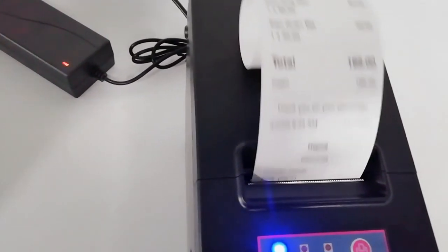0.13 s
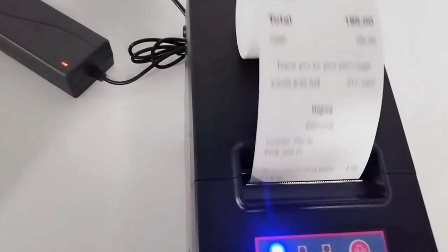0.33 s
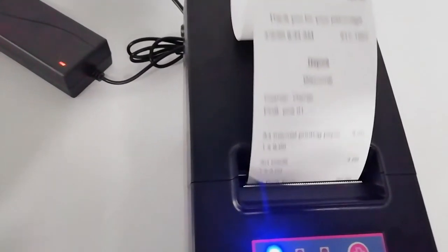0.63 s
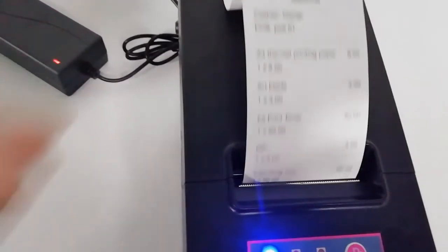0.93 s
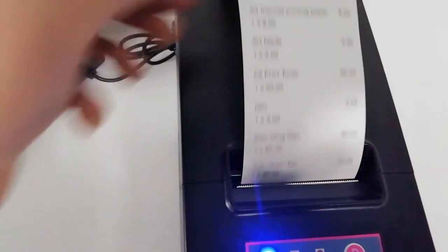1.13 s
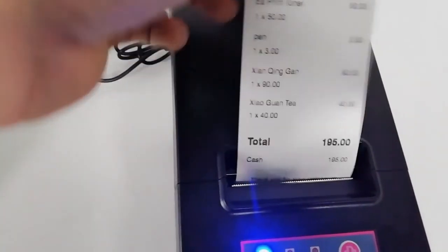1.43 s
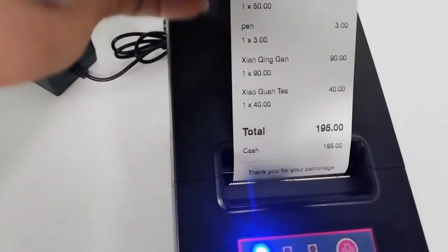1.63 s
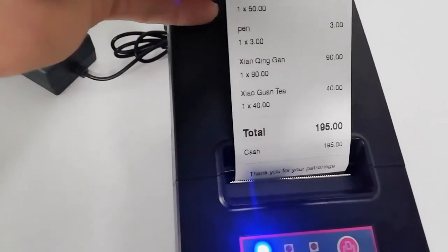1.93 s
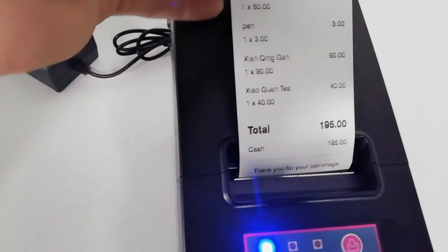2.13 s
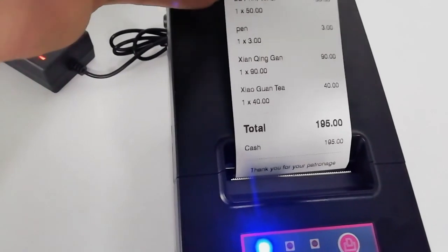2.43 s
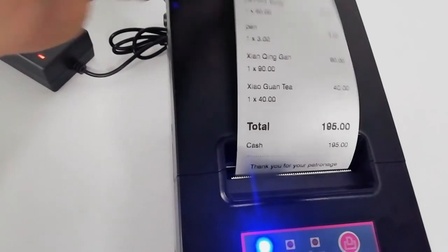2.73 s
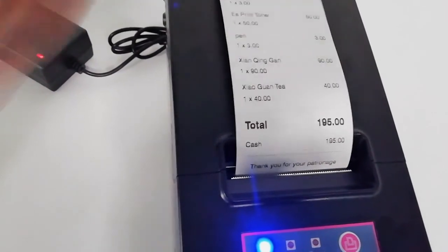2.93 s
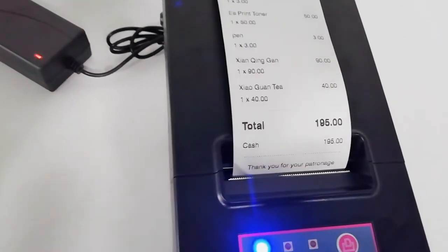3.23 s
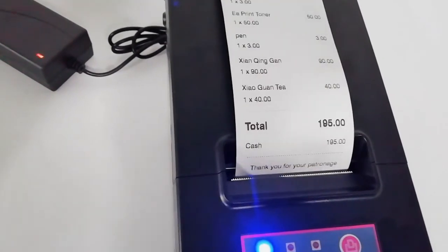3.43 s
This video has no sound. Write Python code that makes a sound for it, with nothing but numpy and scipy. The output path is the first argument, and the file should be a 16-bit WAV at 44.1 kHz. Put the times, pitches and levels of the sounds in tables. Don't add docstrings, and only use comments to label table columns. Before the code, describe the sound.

A small receipt printer whines steadily, paper hissing and gears clicking, then stops with a brief second buzz; a hand rustles and snaps the strip. Close microphone, quiet room with low rumble.

```python
import sys
import numpy as np
from scipy import signal
from scipy.fft import rfft, irfft
from scipy.io import wavfile
from scipy.ndimage import uniform_filter1d

SR = 44100
rng = np.random.default_rng(int(sys.argv[2]) if len(sys.argv) > 2 else 0)


def unload_audio(sound):
    columns = np.transpose(np.atleast_2d(sound))
    steps = np.round(np.clip(columns, -1, 1) * 32767)
    wavfile.write(sys.argv[1], SR, steps.astype(np.int16))


def undo_db(level):
    steps = np.asarray(level, float) / 20
    return 10 ** steps


N = 158760

STEP_HZ, STEPS_PER_TURN = 414.0, 13
START_SPEED = .9
# start t/s, stop t/s, level/dB
MOTOR_RUNS = [
    (-1.0, 1.416, 0.0),
    (1.484, 1.546, -2.5),
]
# t/s, whine lift per step multiple/dB, rattle lift/dB
MOTOR_LOAD = [(0, -0.07, 3.5), (.3, .5, 1), (0.551, 0.21, 1), (.8, 0.19, 0.5), (1.101, -0.2, 1),
              (1.3, -0.35, 1.9), (1.6, -0.1, -1)]


def evened(x):
    return x / np.sqrt(np.mean(x ** 2) + 1e-20)


def coloured(x, points):
    f, db = np.transpose(points)
    hz = np.fft.rfftfreq(len(x), 1 / SR)
    gain = undo_db(np.interp(np.log(hz + 1), np.log(f + 1), db, -90, -90))
    return evened(irfft(rfft(x) * gain, len(x)))


def slow(hz):
    f = np.fft.rfftfreq(N, 1 / SR)
    spectrum = rfft(rng.standard_normal(N)) * (f > 0) / (1 + (f / hz) ** 4)
    return evened(irfft(spectrum, N))


def ring(x, hz, width):
    return signal.lfilter(*signal.iirpeak(hz, hz / width, SR), x)


def ring_twice(x, hz, width):
    return evened(ring(ring(x, hz, width), hz, width))


def add(mix, s, sound):
    part = mix[round(s * SR):][:len(sound)]
    part += sound[:len(part)]


def swell(t, start, peak, end):
    return np.sin(np.pi / 2 * np.interp(t, [start, peak, end], [0, 1, 0])) ** 1.3


def grit():
    grains_per_s = 9000
    size_db = 1.5 * np.minimum(rng.exponential(1, N), 5)
    slips = undo_db(size_db) * (rng.random(N) < grains_per_s / SR)
    return rng.standard_normal(N) * (0.52 + slips)


def patchy(x, depth_db):
    z = signal.stft(x, nperseg=256)[2]
    field = rng.standard_normal(z.shape[::-1]).T
    field = uniform_filter1d(field, size=5, axis=0)
    field = uniform_filter1d(field, size=20, axis=1)
    return signal.istft(z * undo_db(depth_db * evened(field)), nperseg=256)[1][:N]


def rotor(t):
    spin_up_s, coast_s = .012, .0035
    on, speed = np.zeros(N), np.ones(N)
    for start, stop, db in MOTOR_RUNS:
        attack = np.clip((t - start) / 0.001, 0, 1)
        on += undo_db(db) * attack * np.exp(-np.maximum(t - stop, 0) / coast_s)
        lag = np.exp(-np.maximum(t - start, 0) / spin_up_s)
        speed -= (1 - START_SPEED) * (t > start) * lag
    shaft = 2 * np.pi * np.cumsum(speed) * STEP_HZ / STEPS_PER_TURN / SR
    return on, speed, shaft


def gear_whine(t, speed, shaft):
    teeth, eccentric = 12, .11
    waver_db, waver_hz, phase_wander = .2, 5.0, .02
    strain_from_hz = 3100
    step_levels = [-52.5, -63.5, -60.5, -60, -51.5, -58.5, -58.5, -68, -66, -72, -79, -78]
    mesh_levels = [-76, -65.5, -61.5, -58, -76, -65.5]
    idler_orders = [34, 38, 59, 66, 68, 72, 81, 89]
    idler_levels = [-72, -65, -69, -65, -64, -74, -70, -68]
    # t/s, lift/dB
    gear_strain = [(0, -1), (.25, -1), (.5, -1), (.7, -2), (.95, 2), (1.2, 1), (1.35, 3), (1.6, 0)]

    load_s, load_lift, _ = np.transpose(MOTOR_LOAD)
    start_dull_db = -5 * (1 - speed) / (1 - START_SPEED)
    lift_db = np.interp(t, load_s, load_lift) + start_dull_db
    strain_db = np.interp(t, *np.transpose(gear_strain))
    step_orders = STEPS_PER_TURN * (1 + np.arange(len(step_levels)))
    mesh_orders = teeth * (1 + np.arange(len(mesh_levels)))
    whine = np.zeros(N)
    for orders, levels in ((step_orders, step_levels), (mesh_orders, mesh_levels),
                           (idler_orders, idler_levels)):
        for order, db in zip(orders, levels):
            a, b, c = 2 * np.pi * rng.random(3)
            wobble = 1 + eccentric * (np.cos(shaft + a) + .5 * np.cos(3 * shaft + b))
            k = min(order / STEPS_PER_TURN, 6.5)
            if levels is step_levels and order * STEP_HZ / STEPS_PER_TURN < strain_from_hz:
                load_db = k * lift_db
            else:
                load_db = strain_db + k * start_dull_db
            phase = order * shaft + np.pi + c / 3 + k * phase_wander * slow(waver_hz)
            level = undo_db(db + load_db + k * waver_db * slow(waver_hz))
            whine += np.sqrt(2) * level * wobble * np.cos(phase)
    return whine


def case_rattle(t, shaft):
    # f/Hz, width/Hz, level/dB
    case_modes = [(480, 30, -11), (827, 59, 0), (1204, 78, 1), (1580, 140, 0), (2070, 214, 0),
                  (2480, 120, 2), (2830, 154, 1.5), (3410, 137, 1), (3715, 85, -4.5), (4200, 140, -10)]
    # f/Hz, density/dB per Hz
    rattle_colour = [(120, -3), (250, -0.5), (600, -5), (1000, -12.5), (2100, -4.5), (3200, -19.5),
                     (4500, -46), (6000, -9.5)]
    knock = grit() * (1 + .6 * np.cos(STEPS_PER_TURN * shaft))
    case = evened(sum(undo_db(db) * ring(knock, hz, width) for hz, width, db in case_modes))
    rattle = undo_db(-54.5) * coloured(knock, rattle_colour) + undo_db(-51) * case
    load_s, _, rattle_lift = np.transpose(MOTOR_LOAD)
    return rattle * undo_db(np.interp(t, load_s, rattle_lift) + 1.0 * slow(3.8))


def strip_feed(t):
    # f/Hz, density/dB per Hz
    feed_colour = [(3000, -29), (4600, -12), (6000, -5.5), (7000, -3.5), (8500, -4.5), (9300, -12),
                   (11000, -21), (15900, -32)]
    coast_s = 0.011
    hiss = patchy(coloured(grit(), feed_colour), 1.4)
    level = undo_db(-54.5 + 1.0 * slow(25.0))
    return level * hiss * np.exp(-np.maximum(t - MOTOR_RUNS[0][1], 0) / coast_s)


def table_hum():
    band = signal.butter(2, [18, 91], "band", fs=SR, output="sos")
    return undo_db(-49) * evened(signal.sosfilt(band, rng.standard_normal(N)))


def motor():
    t = np.arange(N) / SR
    on, speed, shaft = rotor(t)
    noise = on * case_rattle(t, shaft) + strip_feed(t)
    noise = noise - .6 * ring(noise, 4420, 520)
    hum = table_hum() * uniform_filter1d(on, 4000)
    return on * gear_whine(t, speed, shaft) + noise + hum


def room_tone():
    # f/Hz, density/dB per Hz
    tone_colour = [(15, -4.5), (30, 8), (120, 0), (300, -10.5), (800, -22.5), (2000, -29.5), (4500, -37.5),
                   (15900, -42)]
    return undo_db(-50.5) * coloured(rng.standard_normal(N), tone_colour)


def narrow_swells():
    # start t/s, peak t/s, end t/s, level/dB, f/Hz; the curled sheet singing while pressed, or,
    # during the motor's long feed, rattles in the mechanism
    curls = [(1.43, 1.44, 1.47, -55, 5320), (2.08, 2.11, 2.15, -73, 2560), (2.27, 2.36, 2.39, -68, 4000),
             (2.477, 2.63, 2.71, -61.5, 4240), (2.62, 2.71, 2.735, -57, 5570),
             (1.235, 1.245, 1.26, -53, 1500), (1.23, 1.22, 1.7, -55.5, 1640), (1.24, 1.34, 1.39, -57, 3500),
             (0.028, 0.13, 0.3, -51, 2200), (0.85, 0.94, 1.2, -65, 3700), (0.67, 0.86, 1.3, -59.5, 667),
             (-.05, .05, .22, -57, 540), (1.55, 1.65, 1.78, -62, 400), (1.43, 1.444, 1.456, -54.5, 1230),
             (1.42, 1.45, 1.56, -59, 754), (2.795, 2.806, 2.825, -55.5, 3030),
             (1.28, 1.34, 1.48, -56.5, 1190)]
    # start t/s, peak t/s, end t/s, level/dB, f/Hz; mostly the taut edge whistling briefly, but
    # the two around 1.5 s are the nudging whine turning brighter
    whistles = [(-.1, .05, .22, -62, 6650), (.2, .3, .4, -68, 4100), (.76, .95, 1.12, -61, 4200),
                (1.0, 1.07, 1.15, -70, 6300), (1.168, 1.177, 1.187, -56, 6700),
                (1.19, 1.196, 1.207, -53, 5000), (1.3, 1.33, 1.41, -56, 3650),
                (1.428, 1.44, 1.47, -57, 5000), (1.498, 1.51, 1.532, -51, 2850),
                (1.505, 1.522, 1.533, -53, 2100), (2.087, 2.098, 2.12, -65, 4800),
                (2.53, 2.6, 2.68, -74, 14500)]
    out, t = np.zeros(N), np.arange(N) / SR
    rasp = grit()
    for events, q in ((curls, 4.5), (whistles, 12)):
        for start, peak, end, db, hz in events:
            out += undo_db(db) * swell(t, start, peak, end) * ring_twice(rasp, hz, hz / q)
    return out


def nicks():
    click_levels = [-43, -38, -36.5, -34, -39, -38.5, -44, -46, -38, -39, -37, -42, -35.5, -41, -37]
    # f/Hz, density/dB per Hz
    click_colour = [(800, -30), (1500, -6), (2400, 0), (3500, -1), (4200, -7), (4800, -30)]
    first_s, steps_per_gear_turn, t60_s = .0727, 37, .016
    out, t = np.zeros(N), np.arange(1500) / SR
    noise = rng.standard_normal((len(click_levels), len(t)))
    for turn, (db, z) in enumerate(zip(click_levels, noise)):
        click = coloured(z, click_colour) * undo_db(-60 * t / t60_s)
        s = first_s + turn * steps_per_gear_turn / STEP_HZ
        add(out, s, undo_db(db) * click / abs(click).max())
    return out


def snaps():
    # t/s, peak level/dB, f/Hz
    creases = [(.716, -41, 3000), (.893, -40, 2800), (1.1947, -37, 7000), (1.255, -42, 6500),
               (1.292, -34, 7000), (1.439, -40, 2600), (1.534, -46, 11950), (2.0717, -50, 7000),
               (2.0717, -50, 1000), (2.2, -49, 2600), (2.2, -49, 7000), (2.447, -52, 8000),
               (2.674, -43, 7000), (2.686, -45, 2100), (2.694, -46, 6500), (2.712, -46, 5570),
               (2.751, -50, 4500), (2.762, -55, 10000), (2.789, -45, 6500), (2.7993, -28.5, 5130),
               (2.7993, -38, 14000), (2.803, -39, 6000), (2.808, -41, 5000), (2.84, -51, 2000),
               (2.87, -56, 2500), (2.73, -50, 5500), (2.93, -54, 2000), (3.399, -56, 10000)]
    t60_s, wide_db = .015, -24.0
    out, t = np.zeros(N), np.arange(900) / SR
    noise = rng.standard_normal((len(creases), len(t)))
    for (s, db, hz), z in zip(creases, noise):
        burst = z * undo_db(-60 * t / t60_s)
        wide = evened(np.diff(burst, prepend=0))
        tick = ring_twice(burst, hz, 1.1 * hz) + undo_db(wide_db) * wide
        add(out, s, undo_db(db) * tick / abs(tick).max())
    return out


def strokes():
    # start t/s, rise t/s, fall t/s, level/dB, share of bending/0-1
    stroke_events = [(1.426, .006, 0.066, -49, 0.8), (1.47, 0.048, 0.046, -55.5, 0.24),
                     (1.17, .06, .2, -60, .1), (1.55, 0.0065, 0.04, -53, 0.9),
                     (1.575, 0.017, 0.13, -49, 0.47), (1.618, 0.061, 0.073, -54.5, 0.4),
                     (2.068, 0.028, 0.051, -60.5, 0.3), (2.19, 0.0099, .03, -62.5, 0.56),
                     (2.202, 0.059, 0.052, -61, 0.8), (2.279, 0.059, 0.074, -58, 0.94),
                     (2.428, 0.039, 0.075, -60, 1), (2.498, 0.064, 0.14, -57.5, .9),
                     (2.578, 0.11, .042, -54.5, 0), (2.747, 0.0083, 0.04, -66.5, 0.85),
                     (2.782, 0.01, 0.0081, -52, 0.03), (2.797, .003, 0.024, -49, 0.2),
                     (2.81, 0.037, 0.016, -55.5, 0.1), (2.855, .017, 0.018, -53, 0),
                     (2.88, .05, 0.034, -68, 0.5), (2.9, 0.097, .35, -69, 0.57), (3.5, .1, .1, -77, 0.3),
                     (2.69, 0.035, .018, -58, .4), (1.72, .03, .25, -73, 0.1), (2.03, .07, .12, -71, .3),
                     (2.36, 0.036, 0.073, -67, 0.3), (2.34, .035, 0.027, -62, 0.4)]
    # f/Hz, density/dB per Hz
    slide_colour = [(500, -13), (1200, -13), (2600, -12.5), (4000, -20.5), (6000, -6.5), (7600, -2.5),
                    (11500, -20), (15900, -21)]
    # f/Hz, density/dB per Hz
    scrape_colour = [(400, -4.5), (1000, -4.5), (3500, -7.5), (5800, -13), (8600, 0.5), (11700, -16),
                     (13500, -16), (15900, -20)]
    patch_db = 1.8
    t, slide, scrape = np.arange(N) / SR, np.zeros(N), np.zeros(N)
    for start, rise, fall, db, bend in stroke_events:
        power = (undo_db(db) * swell(t, start, start + rise, start + rise + fall)) ** 2
        bend = np.clip(bend, 0, 1)
        slide += (1 - bend) * power
        scrape += bend * power
    sliding = np.sqrt(slide) * patchy(coloured(grit(), slide_colour), patch_db)
    bending = np.sqrt(scrape) * patchy(coloured(grit(), scrape_colour), patch_db)
    return sliding + bending


def paper():
    flutter = undo_db(1.0 * slow(70.0))
    return flutter * (strokes() + narrow_swells())


def detents():
    # t/s, level/dB, f/Hz, overtone share
    thumps = [
        (1.418, -35, 490, .2),
        (1.444, -47, 491, .5),
        (1.484, -36, 457, .55),
        (1.498, -38, 496, .4),
        (1.514, -41, 430, .3),
        (1.534, -35, 465, .4),
        (1.552, -46, 400, .2),
        (2.802, -41, 440, .08),
        (2.808, -44, 520, .05),
        (2.842, -49, 310, .1),
    ]
    rise_s, t60_s = 0.0058, 0.055
    out, t = np.zeros(N), np.arange(6000) / SR
    for s, db, hz, overtone in thumps:
        tone = np.sin(2 * np.pi * hz * t) + overtone * np.sin(2 * np.pi * 2.55 * hz * t)
        add(out, s, undo_db(db - 60 * t / t60_s) * np.minimum(t / rise_s, 1) * tone)
    return out


def room(x):
    t60_s, wet_db = 0.28, -13.5
    t = np.arange(SR // 2) / SR
    signs = rng.choice([-1., 1.], len(t))
    sparse = (rng.random(len(t)) < .05) * (t > .004)
    taps = signs * sparse * undo_db(-60 * t / t60_s)
    return undo_db(wet_db) * signal.fftconvolve(x, taps / np.linalg.norm(taps))[:N]


def scene():
    near = nicks() + detents() + paper() + snaps()
    return (motor() + near + room(near) + room_tone())[None]


def roll_off(x):
    return signal.sosfilt(signal.butter(12, 15840, fs=SR, output="sos"), x)


def record(dry):
    # f/Hz, width/Hz, lift as a linear gain
    port_peaks = [(7350, 840, 1.09), (8130, 610, 0.7)]
    bright = dry + sum(lift * ring(dry, hz, width) for hz, width, lift in port_peaks)
    edge = signal.firwin(1023, 15820, window=("kaiser", 9), fs=SR)
    return roll_off(signal.oaconvolve(bright, edge[None], "same"))


dry = scene()
out = record(dry)
unload_audio(out)
```